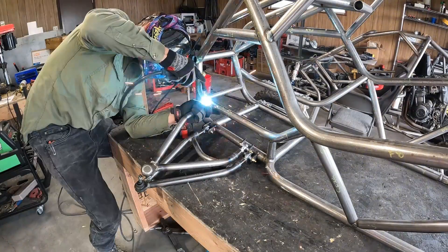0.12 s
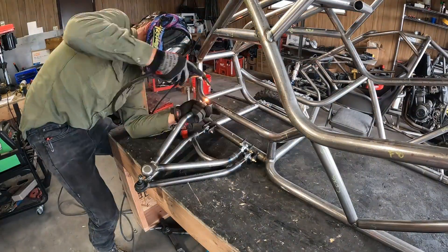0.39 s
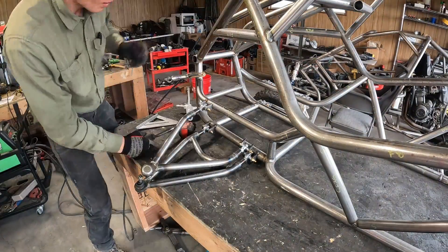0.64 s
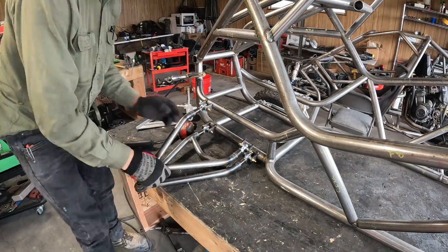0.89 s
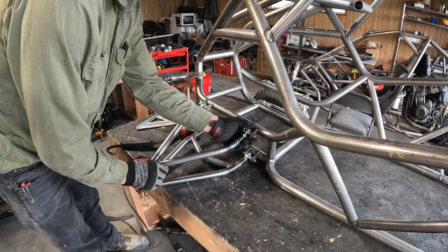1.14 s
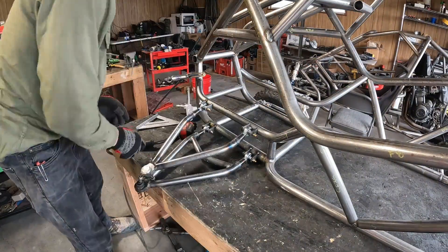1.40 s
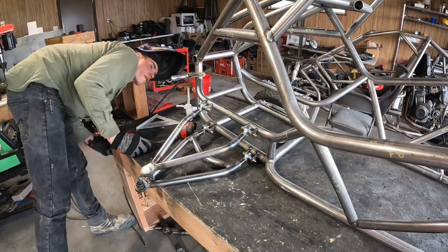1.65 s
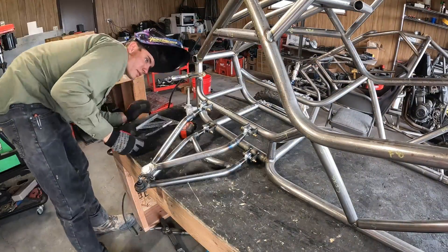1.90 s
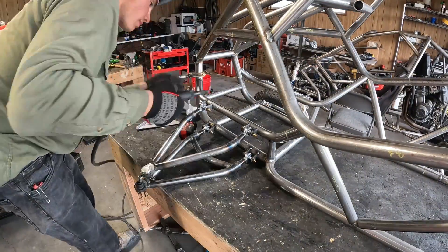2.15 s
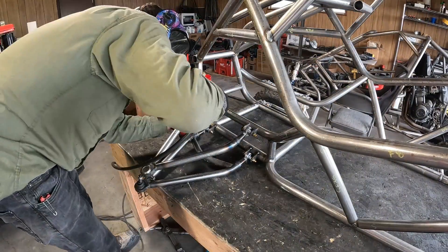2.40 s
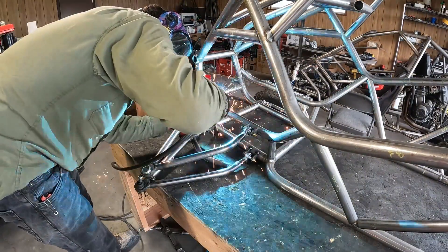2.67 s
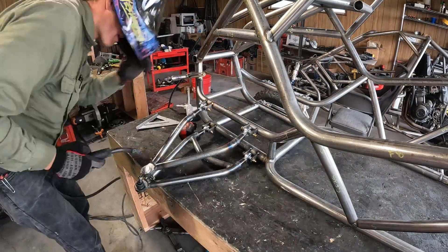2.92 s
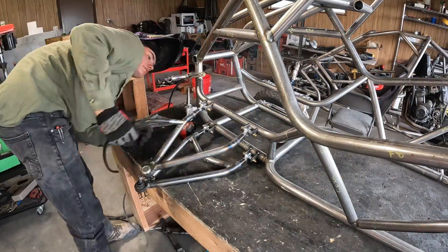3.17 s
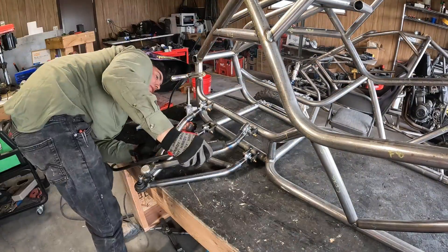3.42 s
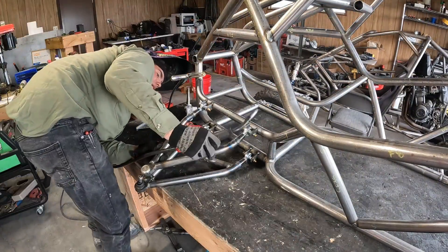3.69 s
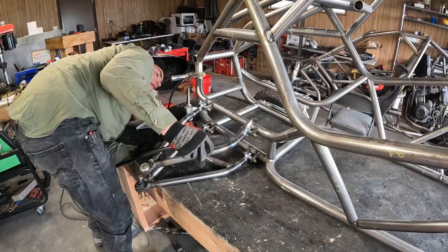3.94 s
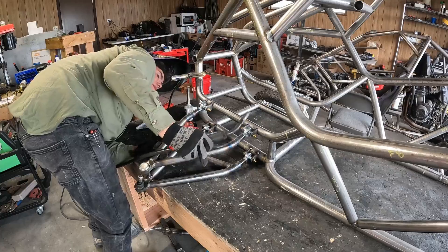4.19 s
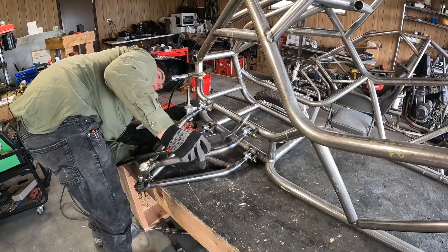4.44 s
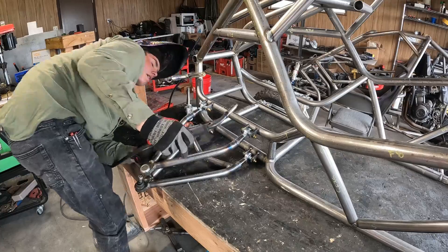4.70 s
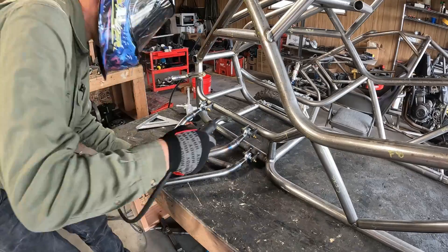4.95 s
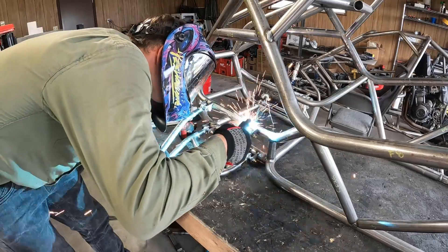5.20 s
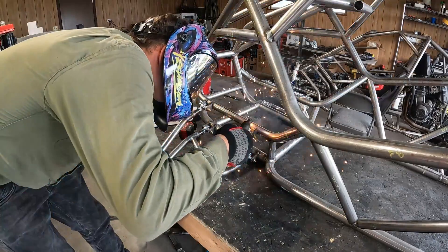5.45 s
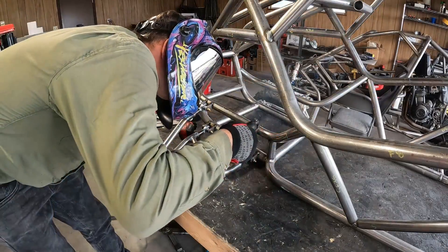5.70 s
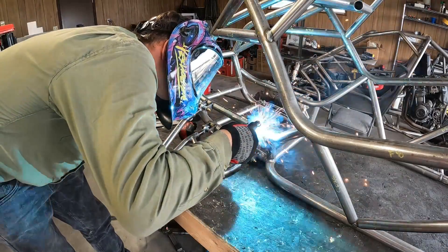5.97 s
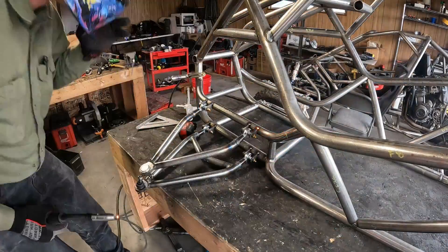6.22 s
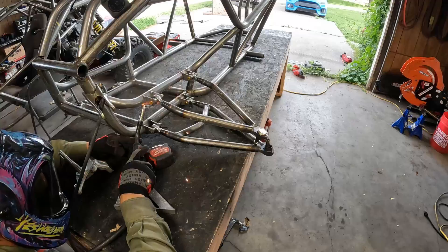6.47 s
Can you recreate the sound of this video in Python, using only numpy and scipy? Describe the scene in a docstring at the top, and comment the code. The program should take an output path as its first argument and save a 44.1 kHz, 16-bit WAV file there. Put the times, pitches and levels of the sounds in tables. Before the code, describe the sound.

Short crackling weld bursts on steel tubing at a hurried pace, with parts knocking, clanking and rapid tool taps between, over a faint machine hum.

```python
"""A welding arc makes short tack welds on a steel tube frame, one after another in quick succession. Each weld
starts with a few hard pops, then buzzes: shaped noise with a snap at every short of the wire. Between welds
parts knock on the bench, a tool taps the tubes in quick runs, fittings clank and gloves scuff: short contacts
set off ringing tones and bursts of noise. Behind it all the power source blows (noise in three ranges) and
whines (sines)."""
import sys
import numpy as np
from scipy import signal
from scipy.fft import rfft, irfft
from scipy.io import wavfile
from scipy.ndimage import uniform_filter1d

SR = 44100
rng = np.random.default_rng(int(sys.argv[2]) if len(sys.argv) > 2 else 0)


def level_to_linear(level):
    """Convert decibel levels to linear amplitude factors, elementwise."""
    exponent = np.asarray(level, float) / 20
    return 10 ** exponent


def transcribe(signal):
    """Save signal, clipped to [-1, 1], as a 16-bit WAV file at the path in sys.argv[1]."""
    frames = np.atleast_2d(signal).T
    limited = np.clip(frames, -1, 1)
    pcm = np.round(limited * 32767).astype(np.int16)
    wavfile.write(sys.argv[1], SR, pcm)


N = 291060

# All levels are relative settings; the functions add their own gains.
# the welds: wire touches t/s, sputters for t/s, burns for t/s, sputter level/dB, arc level/dB
WELD_TIMES = [(0.092, 0.088, 0.21, -41, -37.5), (2.523, 0.064, 0.22, -38.5, -39),
              (5.168, 0.095, 0.24, -39.5, -36), (5.777, 0.051, 0.24, -35, -36), (6.478, .2, .1, -38, -40)]
# how each weld is coloured and placed: lifted band f/Hz, lift level/dB, # left over right below 3500 Hz
# level/dB, side level/dB, boom below about 1600 Hz level/dB
WELD_PLACES = [(6500, 6, -1.5, -6.5, 4), (5840, 3.5, 0.5, -6.5, 3), (8400, 3.5, -5, -7, 5),
               (7550, 0.5, 1.5, -2, 5.5), (8500, 4.5, -3.5, -6.5, 1)]
# spectrum of the arc: f/Hz, level/dB
ARC_SPECTRUM = [(18, -109), (30, -10), (180, -10.5), (450, -8.5), (600, -3), (844, -3.5), (1160, 0),
                (1630, -7), (3500, -6), (5000, -6.5), (7500, -2.5), (9500, -6), (11200, -7), (13500, -6.5),
                (15800, 0), (17000, -10.5)]
# the wire shorts and blows clear: t/s, crack level/dB, push of air over the crack level/dB
WIRE_POPS = [(0.125, -9, -19), (0.1326, -5.5, -8.5), (0.1651, -11, -13.5), (0.1874, -8.5, -37),
             (0.195, -14, -11), (0.2086, -30, -23), (0.224, -32, -26), (0.398, -31, -37),
             (2.5307, -34, -31.5), (2.5385, -11, -18), (2.5492, -4.5, -11), (2.5665, -18, -26),
             (2.57, -21, -7), (2.587, -11, -14), (2.597, -20, -29), (2.6034, -13, -10.5), (2.619, -27, -26),
             (2.776, -11, -26), (5.1887, -31, -19), (5.2427, -16, -29), (5.244, -8, -11), (5.257, -6, -7),
             (5.262, -8.5, -2), (5.2726, -12.5, 3), (5.2982, -19, -3), (5.301, -16, -6), (5.306, -17, -6),
             (5.3116, -15, -9), (5.3132, -20, -2), (5.316, -20, -5), (5.32, -16, -5), (5.323, -15, -10),
             (5.333, -17, -5), (5.351, -20.5, -0.5), (5.352, -24, -7), (5.776, -19, -18), (5.781, -19, -31),
             (5.79, -12, -7.5), (5.805, -23, -29), (5.8182, -17, -26), (5.827, -10, -25), (6.487, -18, -27),
             (6.508, -9, -4.5), (6.566, -8, -34), (6.569, -8, -34), (6.5767, -8, 0), (6.5966, -36, -20)]
# parts set down and nudged: t/s, bench level/dB, tubes over bench level/dB, tick over bench level/dB,
# favoured pitch f/Hz
PART_KNOCKS = [(0.47, -54, 17, 2, 966), (0.494, -56.5, 25, -7, 964), (0.576, -36, -6, -5, 1160),
               (0.613, -37, -1, 1, 1420), (0.652, -24, -9, -20, 1840), (0.737, -53, -23, -14, 1950),
               (0.819, -27, 11, 1, 1830), (0.916, -20.5, -33, -36, 1160), (.96, -44.5, 4, 16, 2040),
               (0.972, -26, -5, -5, 1063), (1.0698, -27, 8, 18.5, 1040), (1.0775, -52, 4, 12, 990),
               (1.091, -45, 12, 15, 1490), (1.109, -34.5, 3, 14, 1690), (1.132, -13, -16, -9, 1250),
               (1.149, -40, -10, -8, 2040), (1.164, -38, 5, 14.5, 2300), (1.179, -56, -6, 8, 1530),
               (1.194, -12.5, -19, -19, 2200), (1.237, -11.5, -18.5, -17, 1040),
               (1.264, -23, -18, -19, 2300), (1.279, -4.5, -25.5, -26, 2210),
               (1.451, -30.5, -11.5, -13, 960), (1.866, -40.5, 0, -6, 1000), (2.05, -57.5, 30.5, 15, 964),
               (2.051, -55.5, 30.5, 8, 964), (2.061, -62, 30, 8, 1535), (2.150, -53, 31.5, 16, 964),
               (2.152, -61.5, 35.5, 8, 1530), (2.224, -62, 35, 8, 2190), (2.321, -24, -16.5, -26, 786),
               (2.337, -36.5, -3, -20, 790), (2.873, -48, 15, 22.5, 1040), (2.905, -53, 13, -1, 960),
               (2.944, -49, 3, 4, 1040), (3.012, -49, 11, 15, 2300), (3.042, -52, 9, 8, 1530),
               (3.1192, -45.5, 34.5, 2, 1920), (3.119, -48.5, 28.5, -2, 964),
               (3.122, -13.5, -30, -31, 1160), (3.138, -47, -32, -9, 780), (3.226, -38, -4, -14, 1590),
               (3.272, -26, -34, -19, 1870), (3.309, -25, -19, -24, 830), (3.354, -28.5, -12, -18, 845),
               (3.579, -23.5, -8.5, -18, 890), (3.596, -27, -13, -19, 600), (3.645, -21.5, -27, -23, 1130),
               (3.693, -39, 4, -2, 1630), (4.709, -12, -19.5, -35, 1074), (6.335, -54, 11, 6, 2300),
               (6.409, -32.5, -8.5, -1, 1600)]
# tool on tube, in quick runs: t/s, tick level/dB, body level/dB
TOOL_TAPS = [(3.389, -21.5, -31), (3.425, -17, -30.5), (3.467, -17.5, -31), (3.5064, -15.5, -28),
             (3.6116, -26, -34), (3.7764, -21.5, -27.5), (3.814, -20, -25.5), (3.8584, -14, -20),
             (3.9027, -16.5, -22.5), (3.9506, -13.5, -19), (3.9938, -13, -21.5), (4.0371, -11, -18.5),
             (4.084, -17.5, -25), (4.127, -15, -22), (4.1714, -17.5, -25), (4.2157, -14, -22),
             (4.2617, -15.5, -22.5), (4.3043, -15, -22), (4.3489, -15.5, -23.5), (4.3908, -17, -23),
             (4.4364, -19, -25.5), (4.525, -16, -22.5), (4.566, -18.5, -23.5), (4.6072, -18, -24.5)]
# ringing tones of the bench: f/Hz, level/dB, 60 dB decay t/s
BENCH_MODES = [(277, -2, 0.2), (334, 10, 0.125), (368, 4, 0.1), (420, -1, 0.1)]
# ringing tones of the tubes: f/Hz, level/dB, 60 dB decay t/s
TUBE_MODES = [(647, -7, 0.4), (722, -15, 0.091), (787, 7.5, 0.044), (964, 0.5, 0.073), (1040, -4, 0.058),
              (1160, 4.5, 0.099), (1310, -7, 0.34), (1330, -19, 0.17), (1406, -1, 0.079),
              (1540, 5.5, 0.043), (1690, -6.5, 0.15), (1738, 3.5, 0.046), (1870, 1, 0.015),
              (2040, 9, 0.042), (2202, -6, 0.037), (2300, 2, 0.064), (2600, -35, 0.11), (2660, 2, 0.081),
              (2980, -2, 0.098), (3340, -10, 0.072), (3650, -28, 0.05), (3740, -27, 0.057)]
# ringing tones of the short arm that the tool taps: f/Hz, level/dB, 60 dB decay t/s
ARM_MODES = [(545, -11, .1), (605, -5, .08), (640, -5, .13), (711, -5, .12), (814, -6, .07), (905, -6, .06),
             (965, -6, .07), (1055, -3, .07), (1159, -4, .2), (1270, -6, .15), (1314, -10, .18),
             (1400, -8, .07), (1539, -5, .09), (1610, -8, .08), (1694, -5, .17), (1785, -2, .11),
             (1850, -3, .06), (2055, -12, .1), (2180, -6, .06), (2255, -1, .08), (2301, -6, .12),
             (2432, -9, .18), (2525, -13, .14), (2700, -10, .05), (3375, -8, .09)]
# spectrum of the bright tick of a blow: f/Hz, level/dB
TICK_SPECTRUM = [(1470, -70), (2500, -18), (3460, -6), (4880, -6.5), (5830, -3.5), (9890, -1), (16000, -5)]
# spectrum of the clatter after a blow: f/Hz, level/dB
CLATTER_SPECTRUM = [(180, -32), (300, -43), (330, 12.5), (492, -14), (622, 4), (2250, -7), (5000, -9.5),
                    (6500, -48), (11000, -120)]
# parts slide on the bench: start t/s, length t/s, level/dB
BENCH_SLIDES = [(.72, 0.47, -47.5), (1.1, 0.23, -37), (3.27, 0.16, -43), (3.8, 0.87, -42.5)]
# loose fittings clank together: t/s, level/dB, favoured pitch f/Hz, shower 60 dB decay t/s,
# share of the free ringing time [1]
FITTING_CLANKS = [(0.8184, -5, 5650, 0.018, 1), (0.828, -21, 5900, 0.076, 0.18),
                  (.974, -27.5, 5050, .05, 0.49), (1.0706, -21, 5890, 0.031, 0.99),
                  (1.0747, -14.5, 5050, 0.074, 0.98), (1.078, -21, 6900, .07, 0.64),
                  (1.106, -25, 10200, 0.074, .5), (1.134, -18, 5170, 0.048, 0.47),
                  (1.167, -24, 5050, 0.043, .4), (4.708, -27, 3360, 0.032, 0.38)]
# ringing tones of the small fittings: f/Hz, level/dB, 60 dB decay t/s
FITTING_MODES = [(3360, -8.5, 0.12), (3600, -17, 0.3), (4350, -23, .03), (4890, -1, 0.062),
                 (5050, -7, 0.086), (5300, -16.5, 0.11), (5650, -7, 0.033), (5890, 0.5, 0.017),
                 (6260, -28, .03), (6500, -0.5, 0.13), (6900, -13, 0.048), (7500, -4, 0.084),
                 (8320, -6, 0.069), (8500, -15, .1), (9570, -11, 0.072), (10200, -28, 0.041),
                 (11530, -9, 0.088)]
# gloves and sleeves: t/s, level/dB, 60 dB decay t/s
GLOVE_SCUFFS = [(1.546, -36, 0.19), (2.452, -34, 0.29), (3.04, -31.5, 0.037), (3.248, -23, 0.029),
                (4.7594, -39.5, 0.12), (4.838, -20.5, 0.084), (4.9694, -37, 0.14), (5.048, -45, 0.051),
                (5.185, -19.5, 0.047), (6.333, -45, 0.025), (6.407, -46, 0.22)]
# loudness curve of the machine: t/s, level/dB
MACHINE_LEVEL = [(.09, -53.5), (.45, -49), (.8, -49.5), (1.2, -51.5), (1.5, -47), (2.05, -43.5),
                 (2.45, -45.5), (2.88, -49), (3.15, -47), (3.4, -49.5), (4.5, -44), (4.75, -43.5),
                 (5.16, -45.5), (5.57, -48), (6.13, -52), (6.38, -45.5), (6.6, -47)]
# spectrum of the fan: f/Hz, level/dB
FAN_SPECTRUM = [(18, -73), (30, -22.5), (115, -18), (400, -19), (680, -21.5), (760, -11.5), (1200, -3),
                (1800, -1.5), (2500, -4), (3300, 0.5), (3900, -3), (4500, -5), (6100, -5.5), (6700, -3.5),
                (7400, -6), (12000, -9), (16000, -2)]
# steady tones of the whine: f/Hz, level/dB
WHINE_TONES = [(782, -62), (1567, -65), (1868, -65.5), (3914, -67), (5600, -64), (9335, -66.5),
               (13065, -67.5)]
# a second whine with its octave comes and goes: start t/s, length t/s, level/dB
SINGING_TIMES = [(.2, 0.19, -47), (.48, 0.066, -53), (.68, 0.27, -51), (1.07, 0.11, -48), (1.35, 0.35, -51),
                 (1.74, 0.26, -48.5), (2.0, 0.15, -42.5), (2.22, 0.13, -43.5), (2.94, 0.19, -46.5),
                 (3.17, 0.13, -51.5), (3.4, 0.63, -49), (4.2, 0.26, -44), (4.55, 0.62, -51.5),
                 (5.5, 0.64, -51.5), (6.2, 0.11, -53.5), (6.4, 0.03, -46)]
# stereo width of arc, handling and machine: f/Hz, gain of the side signal level/dB
ARC_SIDE = [(60, 16), (240, -7.5), (950, 0), (3770, 0), (15000, -0.5)]
HAND_SIDE = [(60, 13), (240, -20), (950, -19.5), (3770, -12), (15000, -7)]
MACHINE_SIDE = [(60, -9), (180, -15), (550, -11.5), (1650, -15), (4970, -6), (15000, -9.5)]
# stereo lean of arc, handling and machine: f/Hz, left over right level/dB
ARC_BALANCE = [(60, -3), (240, 0.5), (950, -3.5), (15000, 0.7)]
HAND_BALANCE = [(60, -0.02), (950, -0.83), (15000, -1)]
MACHINE_BALANCE = [(60, -2), (240, -1), (950, -0.5), (3770, -1), (15000, 2)]
# the stereo picture folds to the middle, then opens again: folded t/s, stays t/s, opening speed [dB/s]
STEREO_FOLDS = [(.36, 0.066, 116), (2.8, 0.046, 113), (5.45, 0.318, 3000), (5.948, .42, 600)]


def arc():
    """The wire sputters first; in the steady arc, droplets short it at a nearly even pace and each one snaps."""
    shorts_per_s, roar_hz, roar_t60_s, roar_db, roar_after_s = 560, 660, 0.02, -2, 0.028
    touch_db_per_s, break_db_per_s, grows_db_per_s, sag_db_per_s = 3000, 700, 9.5, 64
    lift_width_hz, boom_fade_s = 3500, 0.046
    times = np.cumsum(np.exp(0.32 * rng.standard_normal(6000)) / shorts_per_s)
    sizes = level_to_linear(3.5 * rng.standard_normal(6000))
    inside = times < N / SR
    shorts = clicks(times[inside], sizes[inside])
    spits = dying(shorts, t60=0.002, rise_s=0.00003) * rng.standard_normal(N)
    snaps = colour(rms_one(spits - 0.7 * shorts) * level_to_linear(1.3 * drift(40)), ARC_SPECTRUM)
    hiss = colour(rng.standard_normal(N) * level_to_linear(0.39 * drift(38)), ARC_SPECTRUM)
    # the young arc gurgles in the gap between the tubes
    roar = rms_one(ring(shorts ** 2 * rng.standard_normal(N), roar_hz, roar_t60_s))
    t = np.arange(N) / SR
    cracks = pops()
    unsteady_db = drift(1.8)
    mid, side, lean_db = np.zeros((3, N))
    for weld, place in zip(WELD_TIMES, WELD_PLACES):
        touch_s, sputter_s, burn_s, sputter_db, arc_db = weld
        hz, lift_db, left_db, side_db, boom_db = place
        steady_s = touch_s + sputter_s
        break_s = steady_s + burn_s
        steady = t > steady_s
        buzz = np.where(steady, level_to_linear(6.3) * snaps + level_to_linear(1.5) * hiss, hiss)
        edges_hz = [hz - lift_width_hz / 2, hz + lift_width_hz / 2]
        band = signal.sosfilt(signal.butter(1, edges_hz, "band", fs=SR, output="sos"), buzz)
        burning_db = arc_db + grows_db_per_s * (t - break_s)
        sputtering_db = sputter_db - sag_db_per_s * np.maximum(t - touch_s, 0)
        gate_db = held([(touch_s, sputter_s + burn_s, 0)], touch_db_per_s, break_db_per_s)
        level_db = np.where(steady, burning_db, sputtering_db) + gate_db
        # the boom is strongest around the moment the arc becomes steady
        swell_db = boom_db * np.exp(-((t - steady_s) / boom_fade_s) ** 2)
        low = passed(buzz, 1600, "low") + level_to_linear(roar_db) * roar * (t > steady_s + roar_after_s)
        boom = (level_to_linear(swell_db) - 1) * low
        lit = (t > touch_s - 0.01) & (t < break_s + 0.1)
        coloured = buzz + (level_to_linear(lift_db) - 1) * band + boom
        sound = level_to_linear(level_db + unsteady_db) * coloured + cracks * lit
        mid = mid + sound
        side = side + level_to_linear(side_db) * sound
        lean_db[lit] = left_db
    out = placed(mid, side, ARC_SIDE, ARC_BALANCE)
    # each weld leans to one ear in its lower range
    return out + passed(out, 3500, "low") * (level_to_linear(lean_db / 2 * [[1], [-1]]) - 1)


def pops():
    """A sharp crack, a spit of noise, and a dip of pressure that recovers slowly."""
    s, crack_db, push_db = np.transpose(WIRE_POPS)
    crack = clicks(s, -level_to_linear(crack_db))
    spit = rng.standard_normal(N) * dying(np.abs(crack), t60=0.0084, rise_s=0.0001)
    push = clicks(s + 0.00047, level_to_linear(crack_db + push_db + 3.5))
    recovery = level_to_linear(-39) * dying(np.roll(push, 50), t60=0.09, rise_s=0.0016)
    dip = recovery - ring(push, hz=540, t60=0.0044)
    return colour(level_to_linear(6) * crack + level_to_linear(-12.5) * spit, ARC_SPECTRUM) + dip


def handling():
    """Knocks, taps, slides, clanks and scuffs; the whole bench rumbles along."""
    out = knocks() + taps() + slides() + clanks()
    out += bench_shake(out)
    out += scuffs()
    return placed(out, out, HAND_SIDE, HAND_BALANCE)


def knocks():
    """Parts hit the bench; the more the tubes outweigh the bench, the clearer the favoured pitch."""
    s, bench_db, tube_db, tick_db, favoured_hz = np.transpose(PART_KNOCKS)
    favour_db = 15 + 0.75 * np.maximum(tube_db, 0)
    return struck(TUBE_MODES, 1.95, s, bench_db, bench_db + tube_db, bench_db + tick_db,
                  favoured_hz, favour_db, rattle_t60=0.082, clatter_db=12.0)


def taps():
    """The tool rings a short arm, then lands a second time with a short dull knock."""
    rebound_s, rebound_db = 0.0065, 2.5
    s, tick_db, body_db = np.transpose(TOOL_TAPS)
    out = struck(ARM_MODES, 1.7, s, body_db - 1.5, body_db - 10.5, tick_db,
                 favoured_hz=2300, favour_db=1.5, rattle_t60=0.08, clatter_db=4.5)
    second_db = body_db + rebound_db + 3.6 * rng.standard_normal(len(s))
    return out + ring(clicks(s + rebound_s, level_to_linear(second_db)), hz=1300, t60=0.0012)


def struck(metal, uneven_db, s, bench_db, tube_db, tick_db, favoured_hz, favour_db, rattle_t60, clatter_db):
    """A blow thuds in the bench, rings metal near the favoured pitch most, rattles and ticks in the treble."""
    clear_share = 0.42   # the clearer the pitch, the less rattle, dB per dB
    out, thud = np.zeros(N), np.zeros(N)
    luck = rng.standard_normal((len(s), len(BENCH_MODES) + len(metal))).T
    # many small contacts
    grit = rms_one(rng.standard_normal(N) * level_to_linear(5.5 * rng.standard_normal(N)))
    shudder = rng.standard_normal(N) * dying(clicks(s, level_to_linear(bench_db)), rattle_t60 * 1.3, rise_s=0.0057)
    for (hz, level_db, t60), chance in zip(BENCH_MODES, luck):
        blow = clicks(s + 0.0011, level_to_linear(bench_db + 2 * chance))
        thud += level_to_linear(level_db) * ring(level_to_linear(-17.5) * blow + level_to_linear(-46.5) * shudder, hz, t60)
    for (hz, level_db, t60), chance in zip(metal, luck[len(BENCH_MODES):]):
        octaves_off = np.abs(np.log2(hz / favoured_hz))
        away_db = -favour_db * np.minimum(octaves_off / 0.14, 1)
        mode_db = tube_db + level_db + away_db + uneven_db * chance
        strength = clicks(s, level_to_linear(mode_db))
        loose = clicks(s, level_to_linear(mode_db - clear_share * favour_db))
        rattle = grit * dying(loose, rattle_t60, rise_s=0.0048)   # loose contact keeps chattering
        out += ring(level_to_linear(-16.5) * rattle + level_to_linear(-2.0) * strength, hz, t60)
    contacts = clicks(s, level_to_linear(tube_db - 1.014 * favour_db + clatter_db))
    out += colour(grit * dying(contacts, rattle_t60 * 1.73, rise_s=0.0012), CLATTER_SPECTRUM)
    tick = clicks(s, level_to_linear(tick_db))
    envelope = level_to_linear(-3.5) * dying(tick, t60=0.0037, rise_s=0.0001)
    envelope += level_to_linear(-13.0) * dying(tick, t60=0.022, rise_s=0.00086)
    envelope += level_to_linear(-10.0) * dying(tick, rattle_t60, rise_s=0.005)
    ticking = colour(rng.standard_normal(N) * envelope, TICK_SPECTRUM)
    # the bench top is too small to radiate deep tones
    thud = passed(passed(thud, 270, "high"), 500, "low")
    jolt = passed(clicks(s, level_to_linear(bench_db - 1.0)), 240, "low")   # the floor takes the blow
    return passed(out, 340, "high") + thud + jolt + ticking


def slides():
    """Uneven friction keeps the bench modes sounding."""
    friction = rng.standard_normal(N) * level_to_linear(2.0 * drift(31))
    hum = sum(level_to_linear(level_db) * ring(friction, hz, t60) for hz, level_db, t60 in BENCH_MODES)
    level_db = held(BENCH_SLIDES, in_db_per_s=147, out_db_per_s=295)
    return level_to_linear(level_db) * rms_one(passed(hum, 308, "high"))


def clanks():
    """A short shower of contacts rings all the fittings, those near the favoured pitch most."""
    favour_db = 20.5
    grit = rms_one(rng.standard_normal(N) * level_to_linear(1.4 * rng.standard_normal(N)))
    luck = rng.standard_normal((len(FITTING_CLANKS), len(FITTING_MODES)))
    out = np.zeros(N)
    t = np.arange(int(0.4 * SR)) / SR
    for (s, level_db, favoured_hz, t60, free), chances in zip(FITTING_CLANKS, luck):
        start = int(s * SR)
        stop = start + len(t)
        shower = grit[start:stop] * level_to_linear(level_db - 60 * t / t60) * np.minimum(t / 0.00074, 1)
        for (hz, mode_db, mode_t60), chance in zip(FITTING_MODES, chances):
            octaves_off = abs(np.log2(hz / favoured_hz))
            away_db = -favour_db * min(octaves_off / 0.19, 1)
            gain = level_to_linear(mode_db + away_db + 2 * chance - 23.0)
            out[start:stop] += ring(gain * shower, hz, free * mode_t60)
    return out


def bench_shake(work):
    """Work on the bench shakes its legs: low noise follows the loudness of the work."""
    shake_db, shake_s = -22, 0.044
    busy = np.sqrt(uniform_filter1d(work ** 2, int(shake_s * SR)) + 1e-12)
    rumble = passed(colour(rng.standard_normal(N), FAN_SPECTRUM), 700, "low")
    return level_to_linear(shake_db) * busy * rms_one(rumble)


def scuffs():
    """Gloves and sleeves rub: bright noise that flutters and dies away."""
    out = np.zeros(N)
    for at, level_db, t60 in GLOVE_SCUFFS:
        rub = dying(clicks([at], level_to_linear(level_db)), t60, rise_s=0.0037)
        out += rub * np.diff(rng.standard_normal(N + 1)) * level_to_linear(2.0 * drift(52))
    return out


def machine():
    """The power source: fan noise and whines, both following one loudness curve in part."""
    t = np.arange(N) / SR
    before = t < 0.09   # until then the rumble is stronger and the rest weaker
    swing_db = np.interp(t, *np.transpose(MACHINE_LEVEL)) + 50   # around a usual -50 dB
    left_air, right_air = fan(swing_db, before), fan(swing_db, before)
    whine = whines(swing_db, before)
    return spread(left_air + whine, right_air + np.roll(whine, 40), MACHINE_SIDE, MACHINE_BALANCE)


def fan(swing_db, before):
    """Moving air: noise in three ranges, each with its own level and slow drift."""
    rumble_db = -64 + swing_db + 22 * before
    middle_db = -47.5 + 0.49 * swing_db - 3 * before
    hiss_db = -50 + swing_db - 13 * before
    air = colour(rng.standard_normal(N), FAN_SPECTRUM)
    rumble = level_to_linear(rumble_db + 2.0 * drift(12)) * rms_one(passed(air, 700, "low"))
    middle = level_to_linear(middle_db + 0.9 * drift(8)) * rms_one(passed(air, [700, 7000], "band"))
    hiss = level_to_linear(hiss_db + 0.7 * drift(8)) * rms_one(passed(air, 7000, "high"))
    return rumble + middle + hiss


def whines(swing_db, before):
    """Steady tones that waver a little, and a second whine with its octave that comes and goes."""
    singing_hz, octave_db, edge_db_per_s, rest_db = 3280, -7.5, 413, -57
    treble_db = -13 * before
    whine_db = 3.5 + 0.76 * swing_db + treble_db
    t = np.arange(N) / SR + 0.001 * np.cumsum(drift(17.6)) / SR   # unsteady time bends the pitch
    out = np.zeros(N)
    for hz, level_db in WHINE_TONES:
        gain = level_to_linear(whine_db + level_db + 2.0 + 1.55 * drift(5.0))
        out += gain * np.sin(2 * np.pi * hz * t + 0.41 * drift(11))
    turn = 2 * np.pi * singing_hz * t + 0.19 * drift(8.2)
    singing_db = np.maximum(held(SINGING_TIMES, edge_db_per_s, edge_db_per_s), rest_db) + treble_db
    singing = np.sin(turn) + level_to_linear(octave_db) * np.sin(2 * turn)
    return out + level_to_linear(singing_db + 1.0 + 2.0 * drift(21)) * singing


def placed(mid, side, width, leaning):
    """A near source: its tail fills the middle; its early echoes differ between the ears and shift as it moves."""
    turn = 1.06 * drift(2.46)
    echoes = np.cos(turn) * shop(side, t60=0.02) + np.sin(turn) * shop(side, t60=0.0096)
    echoes = passed(echoes, 150, "high")
    return spread(mid + level_to_linear(-9.5) * shop(mid, t60=0.095), echoes, width, leaning)


def shop(x, t60):
    """The room's diffuse tail: noise that dies away after each sound."""
    t = np.arange(int(0.3 * SR)) / SR
    tail = rng.standard_normal(len(t)) * level_to_linear(-60 * t / t60) * np.minimum(t / 0.001, 1)
    return signal.oaconvolve(x, tail / np.sqrt(np.sum(tail ** 2)))[:N]


def spread(mid, side, width, leaning):
    """A middle and a side signal make left and right, which lean by frequency."""
    hz = np.maximum(np.fft.rfftfreq(N, 1 / SR), 1)
    lean_db = at_hz(leaning, hz) / 2
    m = rfft(mid)
    d = rfft(side) * amp_at(width, hz)
    left = irfft((m + d) * level_to_linear(lean_db), N)
    right = irfft((m - d) * level_to_linear(-lean_db), N)
    return np.array([left, right])


def folded(x):
    """The side signal sinks away during each fold, less so in the lowest bass and the top treble."""
    fold_db, fold_db_per_s, share_at_ends = 43, 310, 0.2
    folds = [held([(s, stay_s, fold_db)], fold_db_per_s, opens) for s, stay_s, opens in STEREO_FOLDS]
    depth_db = np.max(folds, axis=0).clip(0)
    mid, side = (x[0] + x[1]) / 2, (x[0] - x[1]) / 2
    top = signal.sosfiltfilt(signal.butter(4, 10000, "high", fs=SR, output="sos"), side)
    bass = signal.sosfiltfilt(signal.butter(2, 400, "low", fs=SR, output="sos"), side)
    ends = top + bass
    side = level_to_linear(-depth_db) * (side - ends) + level_to_linear(-share_at_ends * depth_db) * ends
    return np.array([mid + side, mid - side])


def held(rows, in_db_per_s, out_db_per_s):
    """Level in dB of sounds that swell up to their start, hold for their length and fade."""
    t = np.arange(N) / SR
    levels = []
    for start, length, db in rows:
        early_s = np.maximum(start - t, 0)
        late_s = np.maximum(t - start - length, 0)
        levels.append(db - in_db_per_s * early_s - out_db_per_s * late_s)
    return np.max(levels, axis=0)


def clicks(times, gains):
    """Single samples at given moments."""
    out = np.zeros(N)
    places = np.round(np.asarray(times) * SR).astype(int)
    np.add.at(out, np.clip(places, 0, N - 1), gains)
    return out


def dying(x, t60, rise_s):
    """Each click becomes an envelope that rises quickly and dies away."""
    fall, rise = level_to_linear(-60 / (t60 * SR)), np.exp(-1 / (rise_s * SR))
    decay = signal.lfilter([1], [1, -fall], x + 1e-18)
    return signal.lfilter([1 - rise], [1, -rise], decay)


def ring(x, hz, t60):
    """A unit click sets a dying sine that starts at height 1 ringing."""
    r, w = level_to_linear(-60 / (t60 * SR)), 2 * np.pi * hz / SR
    return signal.lfilter([0, np.sin(w)], [1, -2 * r * np.cos(w), r * r], x + 1e-18)


def drift(rate):
    """Slow chance of spread 1; a higher rate in Hz wanders faster."""
    knots_per_s = 400
    knots = rng.standard_normal(int(N / SR * knots_per_s) + 400)
    r = np.exp(-2 * np.pi * rate / knots_per_s)
    slow = rms_one(signal.lfilter([1], [1, -2 * r, r * r], knots)[398:])
    return np.interp(np.arange(N) * knots_per_s / SR, np.arange(len(slow)), slow)


def colour(x, spectrum):
    """Weigh a signal by a spectrum with a causal (minimum-phase) filter."""
    hz = np.linspace(1, SR / 2, 2049)
    cepstrum = irfft(np.log(amp_at(spectrum, hz) + 1e-6))
    cepstrum[1:2048] *= 2   # fold the later half onto the earlier: no sound ahead of its cause
    cepstrum[2049:] = 0
    taps = irfft(np.exp(rfft(cepstrum)))[:2048]
    return signal.oaconvolve(x, taps / np.sqrt(np.sum(taps ** 2)))[:N]


def passed(x, hz, kind):
    """Butterworth low-, high- or band-pass."""
    return signal.sosfilt(signal.butter(4, hz, kind, fs=SR, output="sos"), x)


def amp_at(points, hz):
    """Gain of a (f/Hz, level/dB) table."""
    return level_to_linear(at_hz(points, hz))


def at_hz(points, hz):
    """Value of a table on a log-frequency axis."""
    table_hz, values = np.transpose(points)
    return np.interp(np.log(hz), np.log(table_hz), values)


def rms_one(x):
    """Scale to rms 1."""
    return x / np.sqrt(np.mean(x ** 2) + 1e-20)


def scene():
    """The arc, the work of the hands and the machine."""
    return arc() + handling() + machine()


def roll_off(x):
    """The treble ends steeply here."""
    return signal.sosfilt(signal.butter(12, 16980, fs=SR, output="sos"), x)


def record(dry):
    """The stereo picture folds and the top treble is cut."""
    top_cut = signal.cheby2(12, 50, 16200, fs=SR, output="sos")
    mix = signal.sosfilt(top_cut, folded(dry))
    return roll_off(mix)


dry = scene()
out = record(dry)
transcribe(out)
```